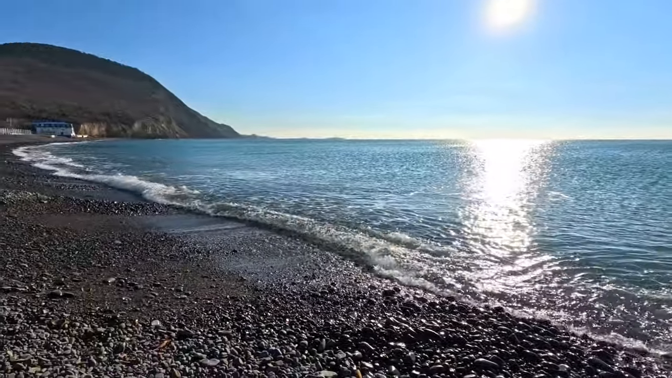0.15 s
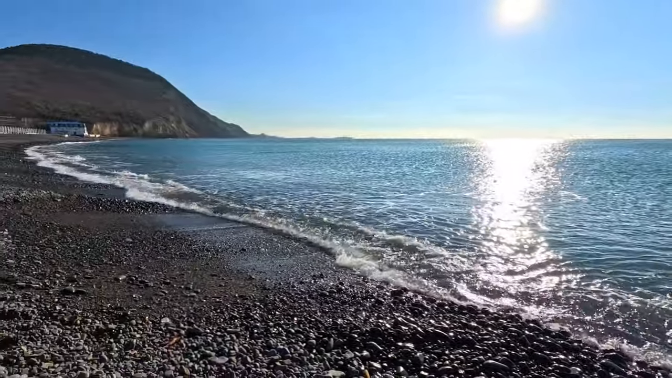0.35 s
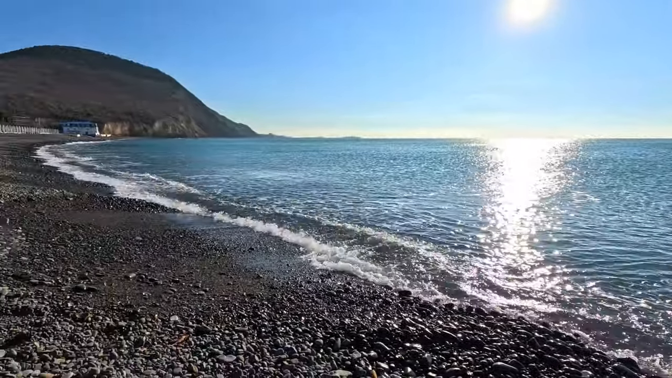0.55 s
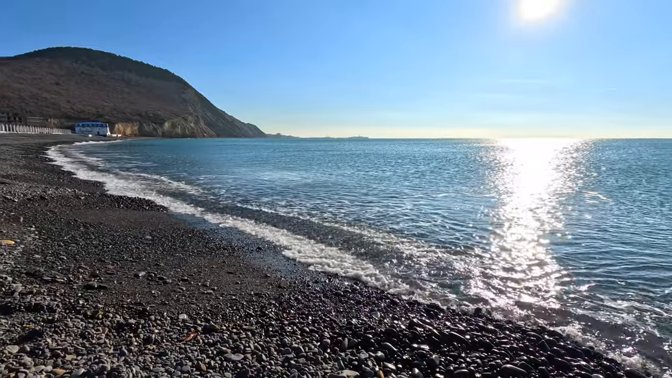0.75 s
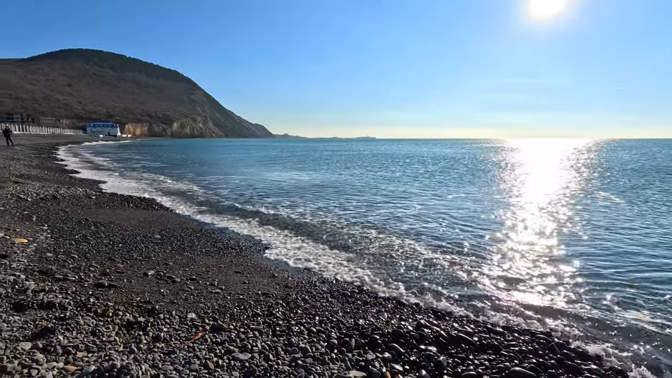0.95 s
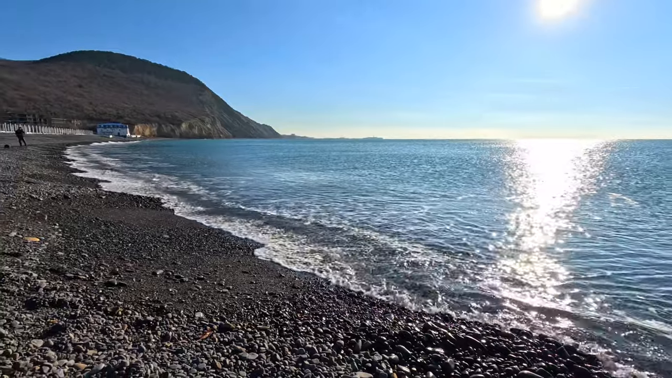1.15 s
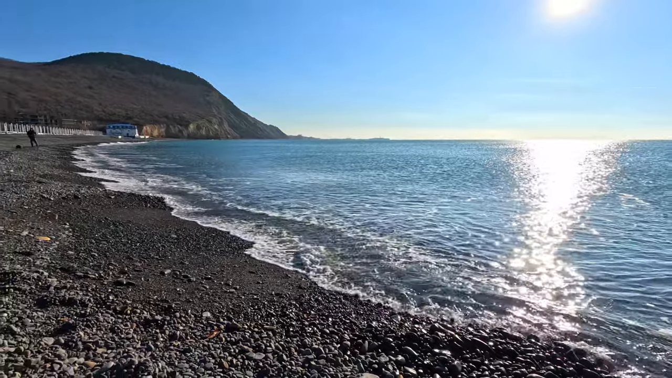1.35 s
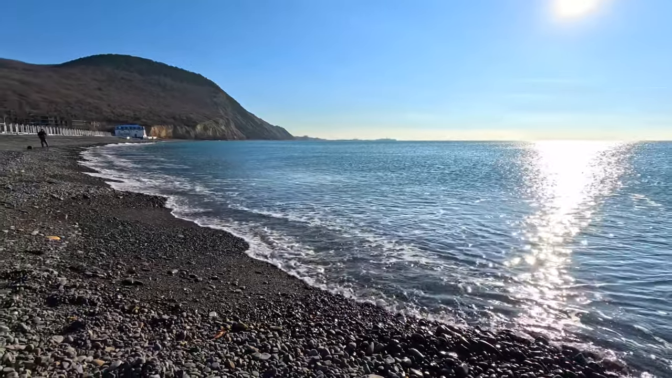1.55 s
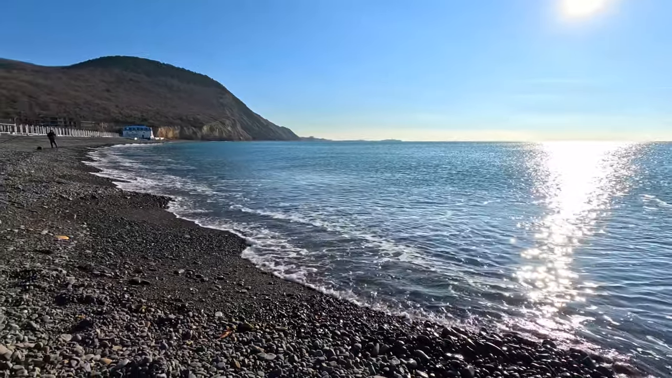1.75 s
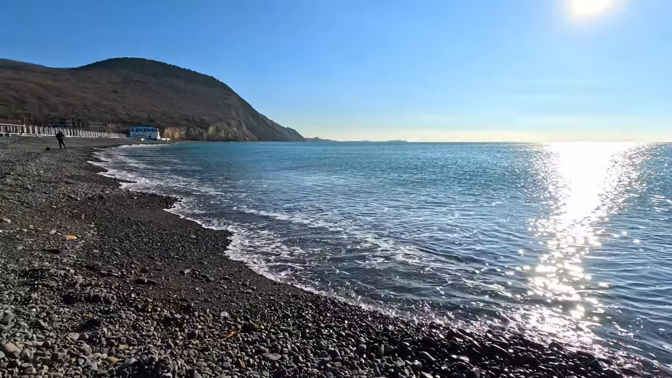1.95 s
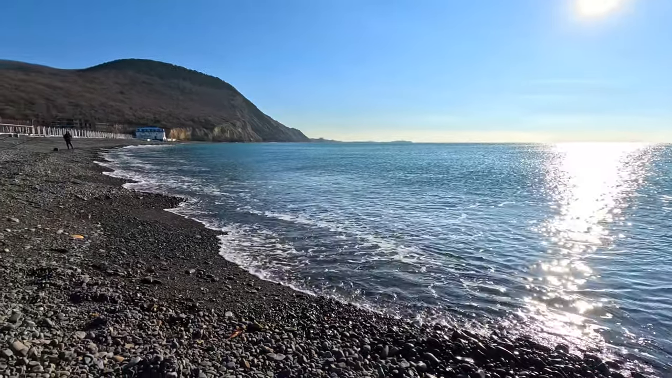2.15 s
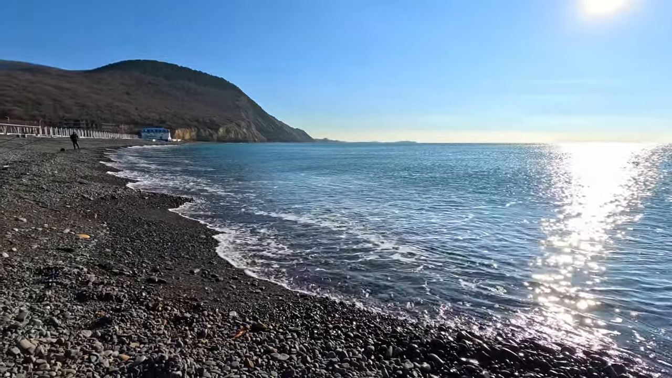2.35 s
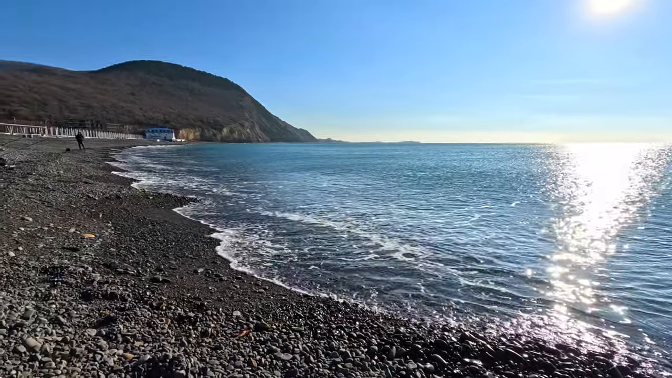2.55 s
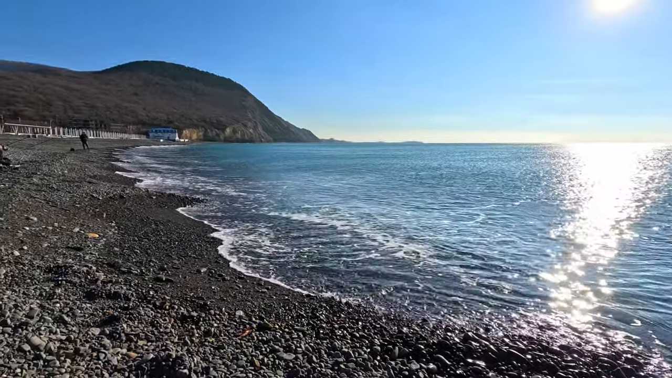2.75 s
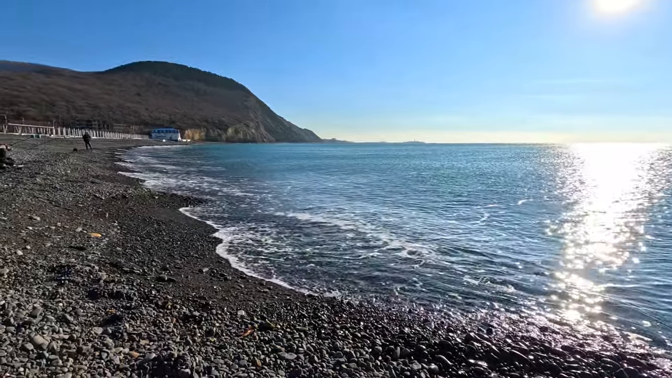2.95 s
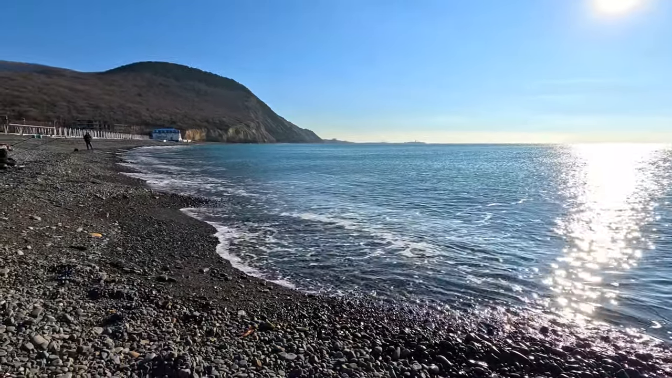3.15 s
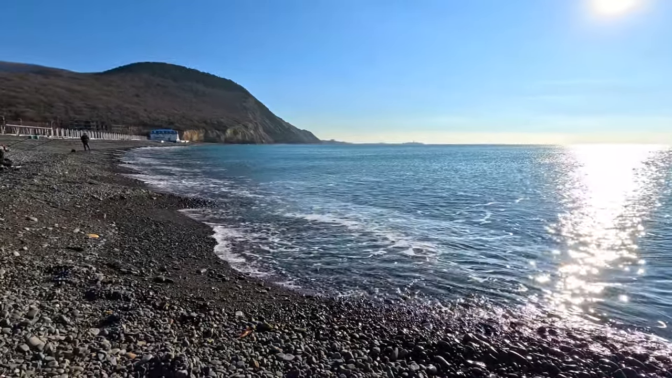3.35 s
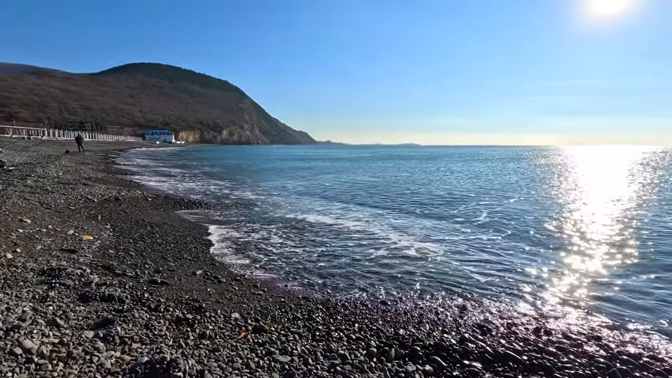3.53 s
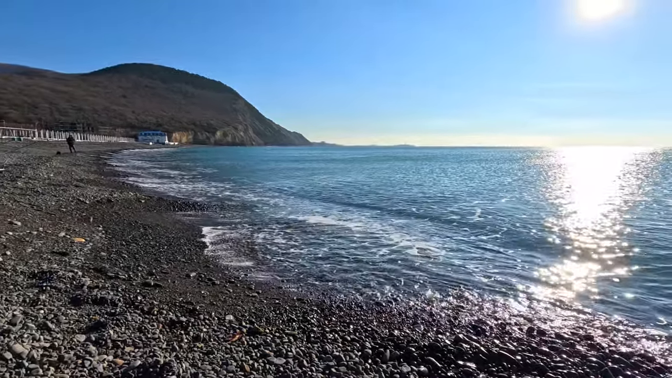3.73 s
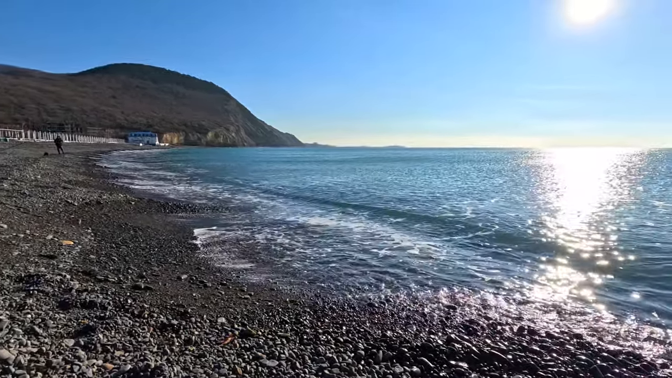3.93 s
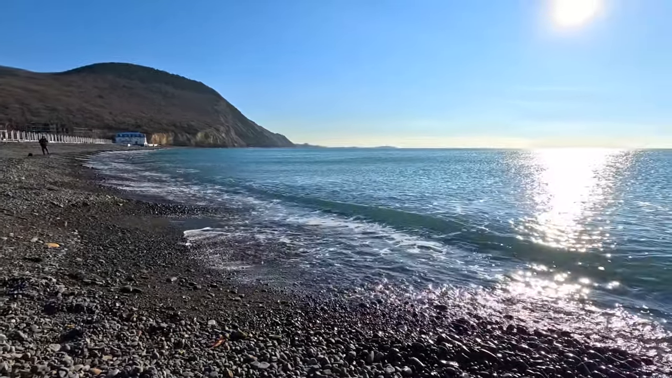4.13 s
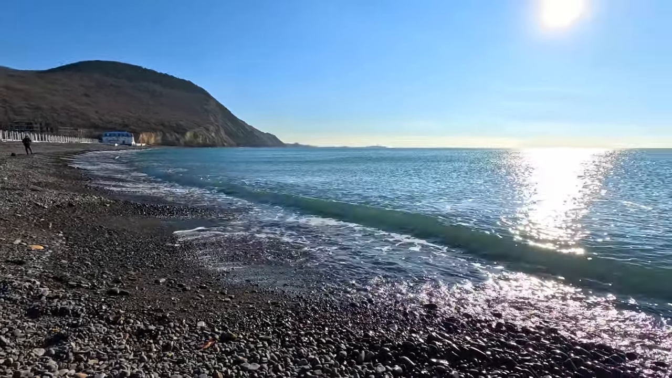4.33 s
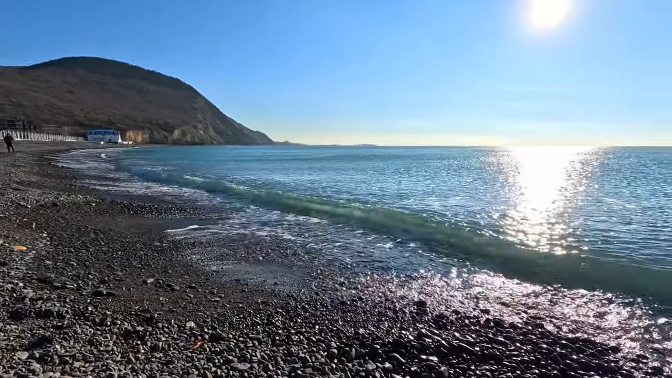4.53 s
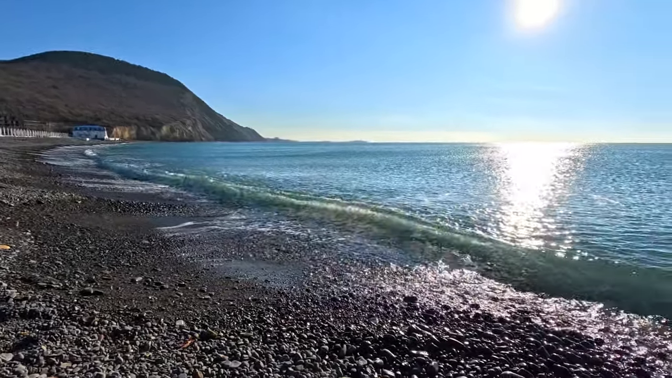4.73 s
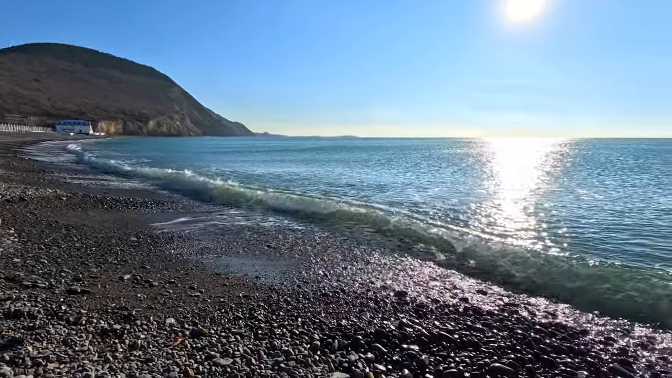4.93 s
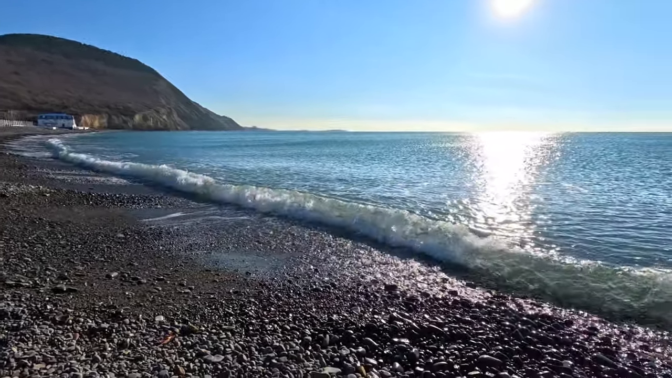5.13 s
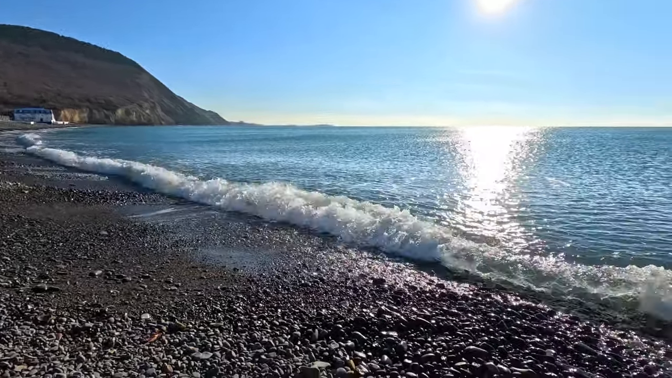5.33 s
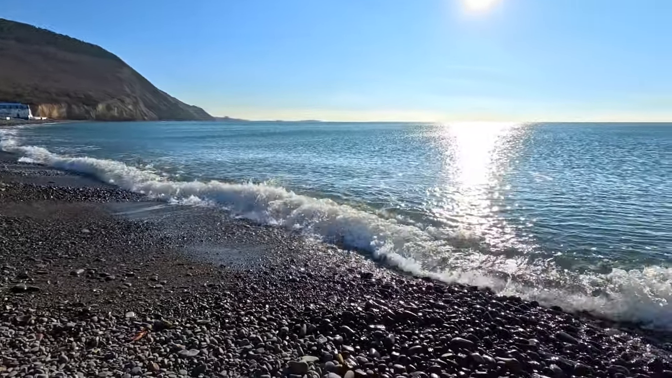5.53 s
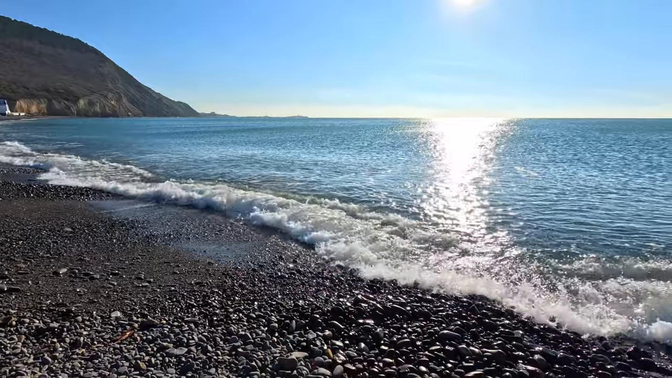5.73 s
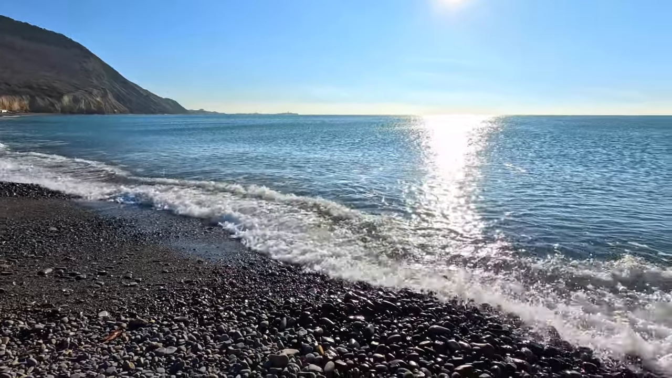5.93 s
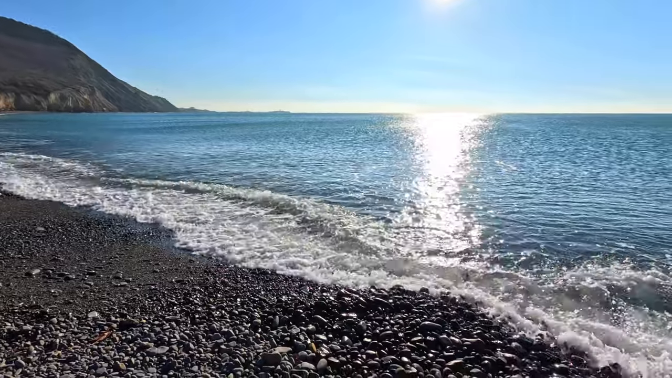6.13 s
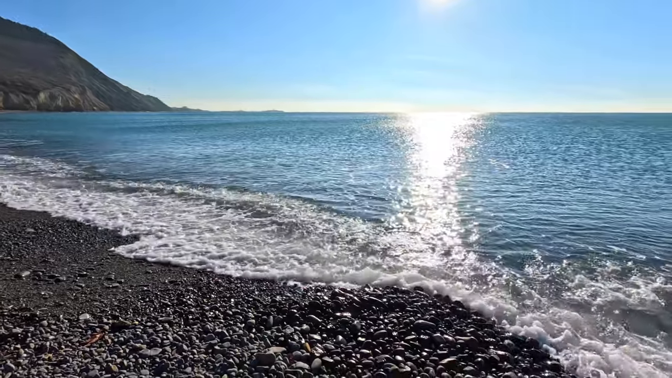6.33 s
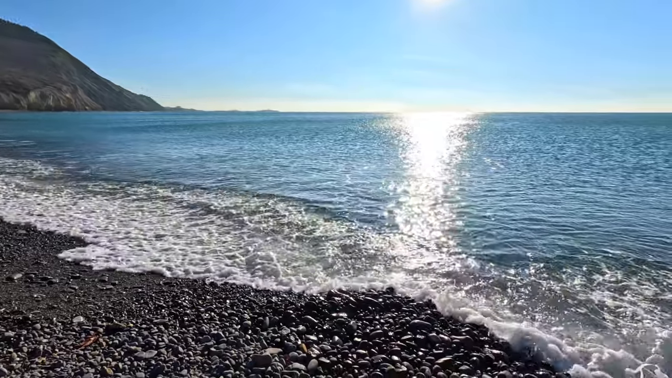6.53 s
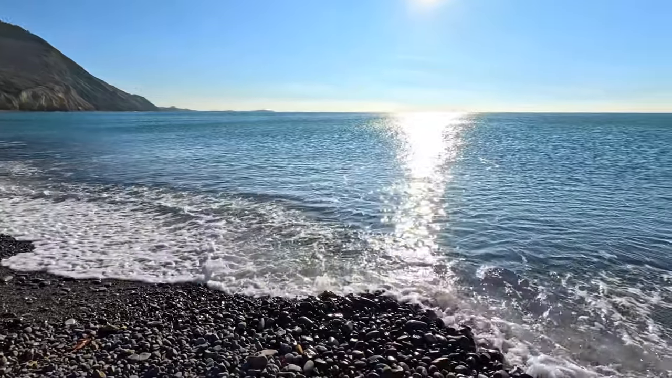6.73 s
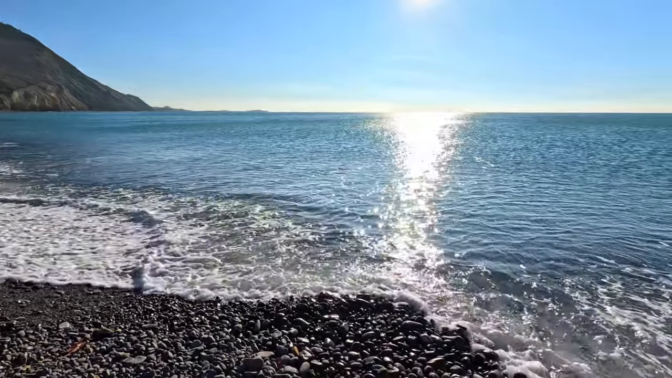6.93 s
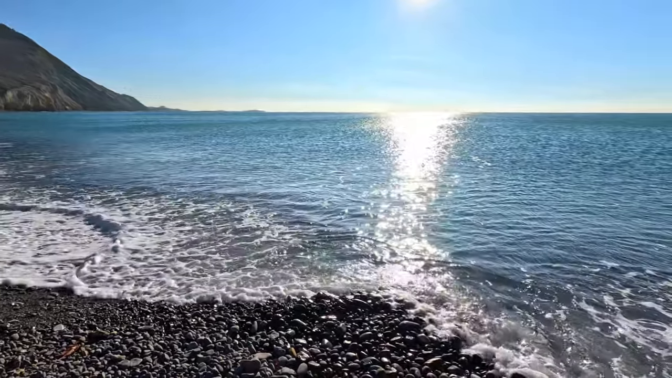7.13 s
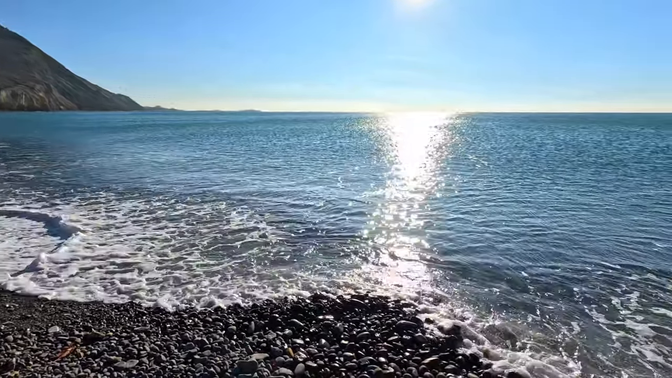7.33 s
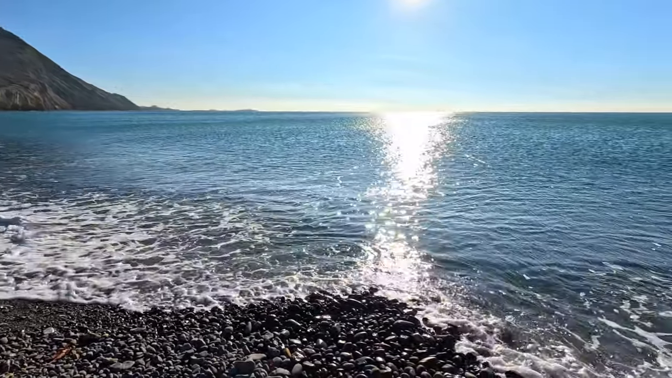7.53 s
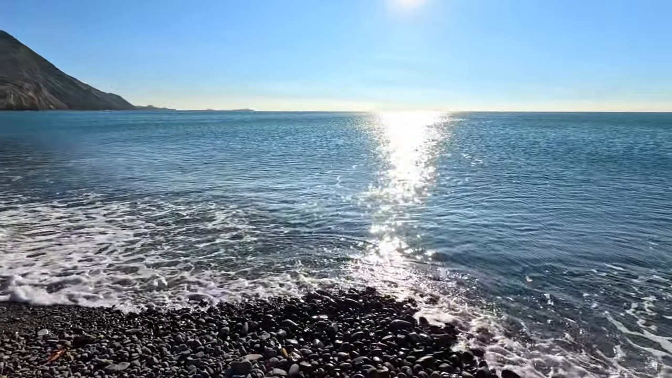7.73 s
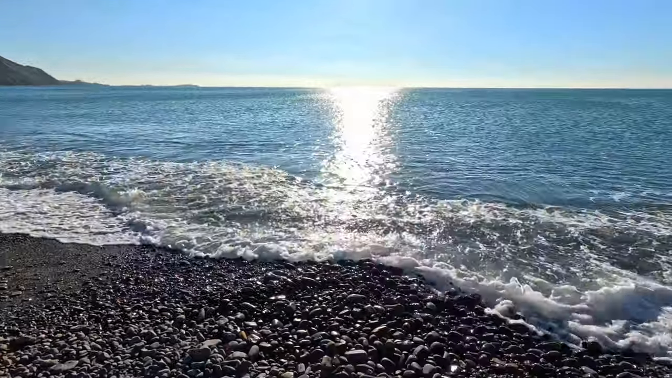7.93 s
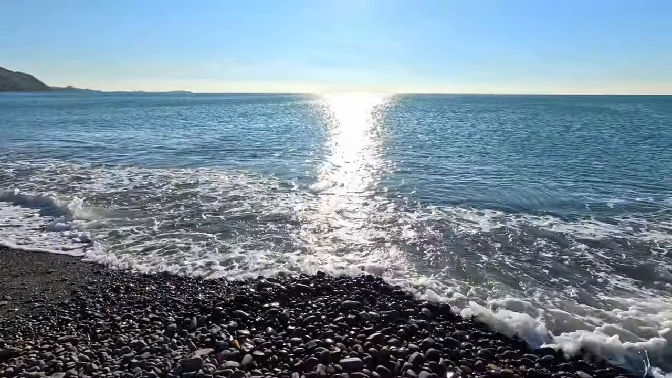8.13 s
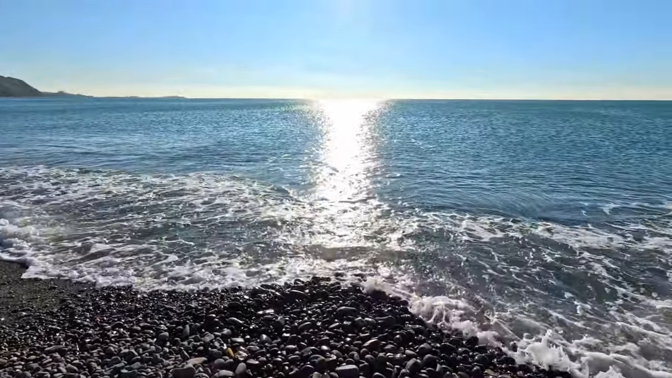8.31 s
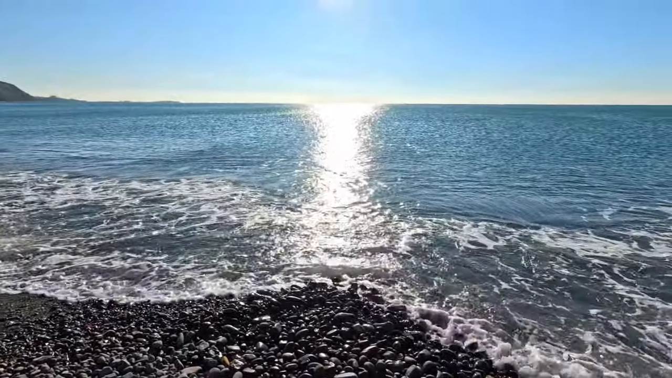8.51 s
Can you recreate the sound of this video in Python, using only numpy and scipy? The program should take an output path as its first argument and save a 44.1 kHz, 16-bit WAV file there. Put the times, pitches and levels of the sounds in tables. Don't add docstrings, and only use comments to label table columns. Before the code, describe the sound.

A pebble beach heard close, centred and nearly mono, in open air with faint distant surf throughout. From 0 s a small wave is already breaking, swelling to a soft frothy rush around 0.5-0.9 s, with low thuds and light spray hiss. From 1.1 to 2.6 s it thins to fizzing foam with distinct rounded bubble plops and tiny droplet ticks. Around 2.8 s it is almost quiet, with slight low wind buffets. From 3.2 s a few stones knock; between 4 and 4.7 s pebbles click brightly as draining water hisses harder. At about 4.9 s a bigger wave plunges, loudest around 5.5-6 s, with deep thuds, dense foam and wide bright spray. Sharp pebble knocks come near 6.4-6.8 s while it fades into bubbling and gurgling by 7.8 s. At about 7.95 s a smaller bright splash starts, then settles into fizzing wash to the end at 8.7 s.

```python
import sys
import numpy as np
from scipy import signal
from scipy.fft import rfft, irfft, next_fast_len
from scipy.io import wavfile
from scipy.ndimage import uniform_filter1d

SR = 44100
rng = np.random.default_rng(int(sys.argv[2]) if len(sys.argv) > 2 else 0)


def ratio(d):
    e = np.asarray(d, float) / 20
    return 10 ** e


def dump(signal):
    limited = np.clip(np.atleast_2d(signal).T, -1, 1)
    pcm = np.round(limited * 32767).astype(np.int16)
    wavfile.write(sys.argv[1], SR, pcm)


N = 382347
TIME = np.arange(N) / SR

# (time [s], pull [dB])
DRAG = [(0, -53), (1.2, -47), (2, -42), (2.8, -66), (3.5, -49.5), (3.94, -44), (4.0, -42), (4.3, -40),
        (4.65, -37.5), (4.9, -34), (5.1, -26), (6.2, -50), (6.6, -34), (6.9, -45), (7.9, -44.5), (8, -38),
        (8.67, -40)]
# (time [s], turn [0-1])
TURN = [
    (0, 0.42),
    (1.8, 0.23),
    (4.3, 0.1),
    (5.2, 0.58),
    (6.4, 0.77),
    (8.67, 1),
]


def read(points, hz):
    f, value = np.transpose(points)
    return np.interp(np.log(hz + 1), np.log(f + 1), value)


def columns(rows, t):
    s, *values = np.vstack(rows).T
    return [np.interp(t, s, v) for v in values]


def evened(x):
    return x / np.sqrt(np.mean(x ** 2) + 1e-20)


def both(a_db, b_db):
    return 10 * np.log10(ratio(a_db) ** 2 + ratio(b_db) ** 2)


def wobble(hz):
    size = max(int(SR / hz / 2), 1)
    noise = uniform_filter1d(rng.standard_normal(N), size)
    return evened(uniform_filter1d(noise, size))


def surges(rows, order=2):
    t = TIME[::64]
    swell_db = sum(db * np.exp(-(2.18 * (t - s) / length) ** order) for s, db, length in rows)
    return np.interp(TIME, t, swell_db)


def clicks(per_s, spread_db):
    out = np.zeros(N)
    hit = np.flatnonzero(rng.random(N) < per_s / SR)
    size, sign = rng.random((N // 4, 2))[:len(hit)].T
    out[hit] = ratio(-spread_db * np.log(size + 0.03)) * np.sign(sign - .5)
    return evened(out)


def churn(per_s, spread_db, grain):
    grain = np.clip(grain, 0, 1)
    near = np.sqrt(grain) * clicks(per_s, spread_db)
    return near + np.sqrt(1 - grain) * rng.standard_normal(N)


def colour(x, points):
    log_gain = np.log(ratio(read(points, abs(np.fft.fftfreq(4096, 1 / SR)))))
    taps = np.fft.ifft(np.exp(np.conj(signal.hilbert(log_gain)))).real[:2048]
    return evened(signal.oaconvolve(x, taps)[:N])


def patchy(x, patch_db, tilt_db=None):
    hz, t, z = signal.stft(x, SR, nperseg=512, noverlap=384)
    patches = uniform_filter1d(rng.standard_normal(z.shape), size=8, axis=0)
    field_db = patch_db * evened(uniform_filter1d(patches, size=16, axis=1))
    if tilt_db is not None:
        slope = np.clip(np.log2(hz / 7000 + 1e-9) / np.log2(12 / 7), 0, 2)
        field_db = field_db + np.outer(slope, np.interp(t, TIME, tilt_db))
    return signal.istft(z * ratio(field_db), SR, nperseg=512, noverlap=384)[1][:N]


def resonate(x, hz, width):
    turn = np.exp(2j * np.pi * np.cumsum(hz) / SR)
    r = np.exp(-np.pi * width / SR)
    smooth = signal.lfilter([1], [1, -2 * r, r * r], x / turn)
    return evened((turn * smooth).real)


def pings(lo_hz, hi_hz, cycles, count):
    when, pitch, size = rng.random((count, 3)).T[:, :, None]
    k = np.arange(400)
    step = lo_hz * (hi_hz / lo_hz) ** pitch / SR
    height = ratio(-4.0 * np.log(size + 0.19)) * np.sqrt(step)
    envelope = height * np.minimum(step * k, 1) * np.exp(-step * k / cycles)
    rings = envelope * np.sin(2 * np.pi * step * k)
    places = (when * N).astype(int) + k
    return evened(np.bincount(places.ravel(), rings.ravel(), minlength=N)[:N])


def calm(level_db):
    return np.clip((-24 - uniform_filter1d(level_db, size=8000)) / 22, 0, 1)


def add(mix, s, sound):
    part = mix[round(s * SR):][:len(sound)]
    part += sound[:len(part)]


def singles(rows, t60, rise, glide, partner):
    out = np.zeros(N)
    t = np.arange(2000) / SR
    for (s, db, hz, *own), (a, b) in zip(rows, rng.random((len(rows), 2))):
        decay = ratio(-60 * t / (own[0] if own else t60)) * np.minimum(t / rise, 1) ** 2
        turn = 2 * np.pi * hz * t * (1 + glide * t)
        upper = np.sin(turn * (1.267 + 0.51 * a))
        lower = np.sin(turn * (0.505 + 0.32 * b))
        ring = decay * (np.sin(turn) + partner * (upper + lower))
        add(out, s, -ratio(db) * ring / abs(ring).max())
    return out


def distant_surf():
    # (frequency [Hz], density [dB per Hz])
    sea_spectrum = [(60, -19), (259, 3.5), (455, 0.5), (673, -1.5), (1910, -7), (3340, -8), (8470, -14.5),
                    (15500, -30)]
    return ratio(-50) * patchy(colour(rng.standard_normal(N), sea_spectrum), 1.0)


def breeze():
    # (time [s], level [dB])
    breeze_levels = [(0, -58), (.8, -63), (1.2, -92), (2.3, -64), (2.9, -58), (4.3, -51), (5, -43),
                     (5.7, -42), (6.1, -67), (7.7, -56.5), (8.67, -54)]
    # (time [s], surge [dB], length [s])
    eddy_rows = [(.175, 4, .06), (1.761, 9, .11), (2.509, 14, 0.078), (2.978, 5, .1), (3.22, 9, .16),
                 (3.52, 9.5, 0.056), (3.61, 9, 0.15), (3.81, 5, 0.13), (4.04, 7, 0.064), (4.43, 7.5, 0.14),
                 (4.56, 8.5, 0.057), (4.754, 8, 0.052), (5.1, 11, 0.27), (5.483, -5, 0.093),
                 (5.697, 5, .07), (5.941, 6, .07), (6.366, 6, .09), (6.984, 10, .07), (7.2, 6, .06),
                 (7.383, 4, .15), (7.832, 13, 0.073), (7.932, 14.5, .05), (8.2, 1, 0.095),
                 (8.635, 13.5, 0.073)]
    # (frequency [Hz], density [dB per Hz])
    gust_spectrum = [(15, -18), (30, -6), (60, 0.5), (110, 3.5), (200, -2.5), (330, -13.5), (500, -38),
                     (4000, -90)]
    gust_db, = columns(breeze_levels, TIME)
    gust_db = gust_db + surges(eddy_rows, order=4) + 1.3 * wobble(29)
    return ratio(gust_db) * colour(rng.standard_normal(N), gust_spectrum)


def draining():
    start_s, end_s = 2.8, 5.0
    pull_db, = columns(DRAG, TIME)
    outside = np.maximum(np.maximum(start_s - TIME, TIME - end_s), 0)
    return pull_db - 100 * outside


def backwash(slaps):
    # (frequency [Hz], density [dB per Hz])
    drain_spectrum = [(800, -21), (1300, -5), (2470, 0), (3200, -2.5), (5000, 1), (7600, -7.5), (9500, -15),
                      (15700, -36)]
    drive = churn(5000, 6.6, 0.46) + .3 * pings(2490, 7700, 9.0, count=2500)
    hiss = colour(drive, drain_spectrum)
    fine_db = 11 - 0.84 * np.clip(draining() + 50, 0, 9)
    return ratio(draining() - 1.5 + 1.6 * slaps) * patchy(hiss, 1.8, fine_db)


def stones():
    # (frequency [Hz], density [dB per Hz])
    stone_spectrum = [(500, -35.5), (1500, 1.5), (2600, -16), (4500, -2.5), (6500, -9.5), (9000, -12.5),
                      (15000, -41)]
    clatter_db = columns(DRAG, TIME)[0] - 6
    t = np.arange(1, 260) / SR
    clumps = ratio(2.5 * wobble(40))
    knocks = 0
    for hz in np.geomspace(2000, 8000, 7):
        cycles = t * hz
        envelope = cycles ** 2 * np.exp(-cycles / 0.88)
        ring = ratio(read(stone_spectrum, hz)) * np.sqrt(hz) * envelope * np.sin(2 * np.pi * cycles)
        knocks = knocks + signal.oaconvolve(clicks(200, 4.1) * clumps, ring)[:N]
    return ratio(clatter_db) * evened(knocks)


def stone_knocks():
    # (time [s], peak [dB], pitch [Hz])
    knock_rows = [(2.381, -35, 1820), (3.234, -29, 1850), (3.273, -35, 1850), (3.3424, -41, 2430),
                  (3.447, -35, 3610), (3.5214, -37, 3070), (3.5297, -31, 3740), (3.2854, -37, 5050),
                  (3.2914, -33, 5800), (3.2974, -35, 7500), (3.991, -35, 6030), (4.0123, -31, 4560),
                  (4.0414, -24, 5630), (4.0582, -23, 6300), (4.1101, -26, 4450), (4.1344, -26, 6260),
                  (4.2142, -21.5, 4630), (4.2448, -31, 4730), (4.2514, -22, 4500), (4.296, -22, 5750),
                  (4.326, -29, 4760), (4.45, -24, 4430), (4.5829, -28, 5190), (4.6194, -39, 5360),
                  (6.445, -14, 5500), (6.6457, -21, 5100), (6.7609, -31, 5270)]
    return singles(knock_rows, t60=0.0036, rise=0.00036, glide=0, partner=0.15)


def droplet_ticks():
    # (time [s], peak [dB])
    tick_rows = [(0.3486, -35), (0.9223, -38), (1.1897, -39), (1.3454, -39), (1.4032, -36), (1.5299, -39),
                 (1.9784, -38), (2.0148, -46), (2.0996, -38), (3.8342, -34), (3.9903, -41), (4.1844, -47),
                 (4.9352, -34), (6.6648, -32), (8.1798, -38)]
    pitched = [(*row, 12500) for row in tick_rows]
    return singles(pitched, t60=.002, rise=0.0003, glide=0, partner=.2)


def bubble_plops():
    # (time [s], peak [dB], pitch [Hz], t60 [s])
    plop_rows = [(1.137, -19.5, 694, 0.03), (1.374, -19, 890, 0.029), (1.682, -20, 1130, 0.018),
                 (1.755, -29, 1090, 0.016), (1.783, -21.5, 1160, 0.023), (1.807, -20, 1100, 0.017),
                 (1.853, -21.5, 950, 0.02), (1.862, -25, 1230, 0.026), (1.952, -36, 824, 0.025),
                 (2.089, -27, 1250, 0.025), (2.224, -25, 1070, 0.025), (2.288, -26, 1170, 0.027),
                 (2.445, -29.5, 1090, 0.018), (2.554, -30, 2490, 0.027), (2.635, -32, 1330, 0.022),
                 (2.803, -35, 890, 0.022), (3.213, -36, 1070, 0.025), (3.297, -34, 480, 0.022),
                 (4.325, -35, 725, 0.027), (4.368, -31, 960, 0.017), (4.04, -35, 524, 0.035),
                 (4.706, -26.5, 1075, 0.035), (6.914, -19, 650, 0.022), (6.947, -28, 985, 0.027),
                 (7.516, -26, 1420, 0.037), (7.682, -30, 1080, 0.035), (7.813, -23.5, 1020, 0.023),
                 (7.943, -28, 890, 0.021), (8.343, -25, 880, 0.023)]
    return singles(plop_rows, t60=.03, rise=0.00057, glide=2.6, partner=0.45)


def foam(slaps):
    # (time [s], amount [dB], commonest bubble's pitch [Hz], small bubbles against large [dB])
    foam_rows = [(0, -34.5, 970, -2), (.5, -28, 890, -2.5), (.8, -27, 860, -5), (1.2, -32.5, 940, -3),
                 (1.8, -35.5, 1104, -8), (2.28, -41, 1050, -2.5), (2.75, -57, 1090, 0.5),
                 (3.9, -52.5, 920, -0.5), (4.25, -44.5, 950, -8), (4.55, -47, 930, -8),
                 (5.08, -28, 860, -0.5), (5.6, -23, 755, -3), (6.3, -25, 810, -8.5),
                 (7.1, -36.5, 920, -5.5), (7.9, -48.5, 960, -3.5), (7.95, -31.5, 870, -5.5),
                 (8.4, -34, 890, -2), (8.67, -36.5, 846, -4)]
    # (frequency [Hz], density [dB per Hz])
    small_spectrum = [(300, -25), (800, -26.5), (1300, -0.5), (2000, -6.5), (3000, -1.5), (4000, -4.5),
                      (6000, -35), (15000, -82)]
    large_db, large_hz, share_db = columns(foam_rows, TIME)
    splash_hz = surges([(8.05, 800, 0.059)])
    small_db = both(large_db + share_db, draining() - 9)
    small_db = small_db + 3.5 * splash_hz / 800
    small_hz = 2370 + (1760 - 2370) * columns(TURN, TIME)[0] + splash_hz
    spread = np.clip(.27 * np.minimum(870 / large_hz, 1) ** 2, 0, .6)
    large = 0
    for step, db in [(-1.125, -2.5), (-0.13, -5.5), (0.91, -3.5)]:  # (steps of spread from the middle size, dB)
        large = large + ratio(db) * resonate(churn(300, 3.2, 0.4), large_hz * (1 + step * spread), 550)
    drive = churn(2500, 3.0, 0.4) + 0.24 * calm(small_db) * pings(1167, 3840, 2.3, count=1200)
    fizz = colour(drive, small_spectrum)
    small = patchy(evened(fizz + 0.58 * resonate(fizz, small_hz, 1290)), 0.64)
    return ratio(large_db + 0.8 * slaps) * evened(large) + ratio(small_db + 0.53 * slaps) * small


def crest(slaps):
    # (time [s], force [dB])
    crest_rows = [(0, -38.5), (.42, -33), (.78, -32.5), (1.5, -45.5), (2.2, -54.5), (2.8, -61), (4.3, -64),
                  (4.8, -42), (4.92, -40), (4.94, -32), (5.07, -26), (5.55, -22.5), (6.1, -25.5),
                  (6.6, -33.5), (7.15, -42), (7.91, -48), (7.94, -38.5), (8.67, -44)]
    # (time [s], surge [dB], length [s])
    pocket_rows = [(4.834, 4.5, 0.062), (5.073, 6, 0.056), (5.473, 7, 0.063), (5.95, -1, .4),
                   (1.1, 1.5, .5), (6.301, 6, 0.025), (6.939, 6.5, 0.056), (7.962, 1.5, .1),
                   (8.191, 4, .03)]
    # (frequency [Hz], density [dB per Hz])
    thud_spectrum = [(60, -17), (120, -12), (200, -1.5), (280, 2), (380, 0), (470, -11.5), (700, -17),
                     (1500, -75.5)]
    # (frequency [Hz], density [dB per Hz])
    spray_spectrum = [(1200, -20.5), (2500, -8.5), (3500, -1.5), (5000, -4), (7000, -5.5), (10000, -13),
                      (13000, -19.5), (15700, -28)]
    spray_db, = columns(crest_rows, TIME)
    turn, = columns(TURN, TIME)
    thud_db = -25 + 1.03 * (spray_db + 25) + 2.5 + surges(pocket_rows)
    thud_db = thud_db - 3.5 * turn
    mist_db = 4 + 0.1564 * (-37 - spray_db) - 3.5 * turn
    thud = patchy(colour(churn(400, 2.9, 0.47), thud_spectrum), 0.99)
    drive = churn(5000, 4.2, .4) + 0.15 * calm(spray_db) * pings(2990, 13850, 6.7, count=3000)
    spray = patchy(colour(drive, spray_spectrum), 0.63, mist_db)
    sizzle = 0.48 * turn
    spray = (spray + sizzle * resonate(spray, np.full(N, 5010), 3140)) / (1 + sizzle)
    return ratio(thud_db + 0.36 * slaps) * thud + ratio(spray_db + 1.0 * slaps) * spray


def hollowed(x):
    band_filter = signal.butter(2, (2420, 3300), "band", fs=SR, output="sos")
    band = signal.sosfiltfilt(band_filter, x)
    depth = surges([(6.93, 0.16, 2.9)], order=6)
    return x - np.clip(depth, 0, 1) * band


def shore(x):
    size = next_fast_len(N + 200)
    hz = np.fft.rfftfreq(size, 1 / SR)
    bounce = 0.22 * np.exp(-(hz / 1500) ** 2 - 2j * np.pi * hz / (2 * 455))
    low_cut = np.minimum(hz / 130, 1) ** 2
    return irfft(rfft(x, size) * (1 + bounce) * low_cut, size)[:N]


def scene():
    # (time [s], surge [dB], length [s])
    slap_rows = [(0.349, 3.5, 0.021), (0.414, 2.7, 0.073), (0.644, 2.5, 0.027), (1.197, 2.5, 0.02),
                 (1.761, 2.1, 0.031), (1.856, -2, 0.024), (2.09, 3.5, 0.061), (3.233, -5, 0.024),
                 (3.293, 7, 0.024), (4.016, 2, 0.028), (4.215, 2, 0.06), (4.455, 0.5, 0.032),
                 (6.949, 4, 0.05), (7.523, 2, 0.038), (7.817, 6, 0.015), (8.062, -1, 0.048),
                 (8.156, 2.1, 0.23), (8.351, 4, 0.044)]
    slaps = 0.051 * wobble(11) + 0.57 * wobble(23) + 0.54 * wobble(64) + surges(slap_rows)
    near = hollowed(crest(slaps) + foam(slaps) + stones())
    water = shore(near + distant_surf() + backwash(slaps))
    mono = water + bubble_plops() + stone_knocks() + droplet_ticks() + breeze()
    return np.array([mono, mono])


def band_limit(x):
    return signal.sosfilt(signal.butter(12, 15720, fs=SR, output="sos"), x)


def record(dry):
    dull = signal.lfilter([.06], [1, -.94], np.roll(dry[0], 700))
    faint = ratio(-45.5) * dull * ratio(8.7 * wobble(14.0))
    edge = signal.firwin(511, 15650, window=("kaiser", 9), fs=SR)
    limited = signal.oaconvolve(dry + np.outer([1, -1], faint), edge[None], "same", axes=1)
    return band_limit(limited)


dry = scene()
out = record(dry)
dump(out)
```